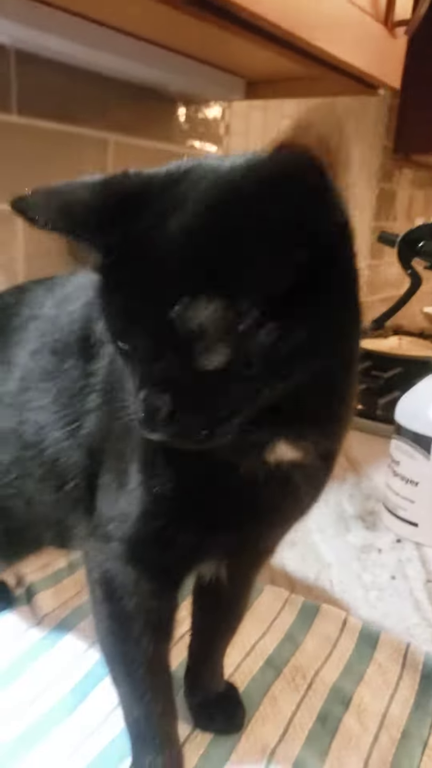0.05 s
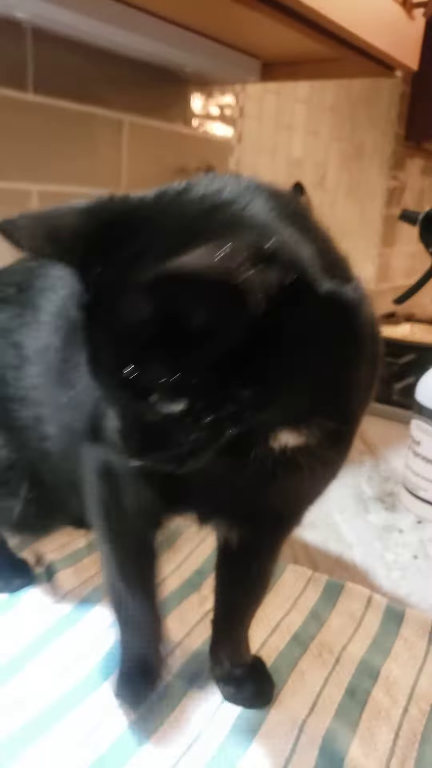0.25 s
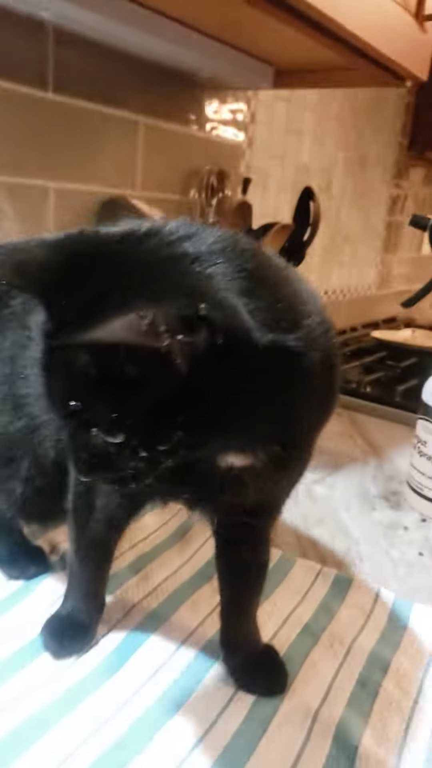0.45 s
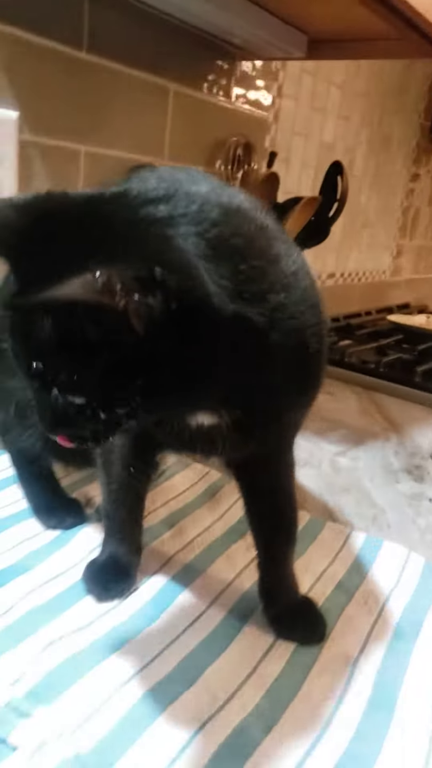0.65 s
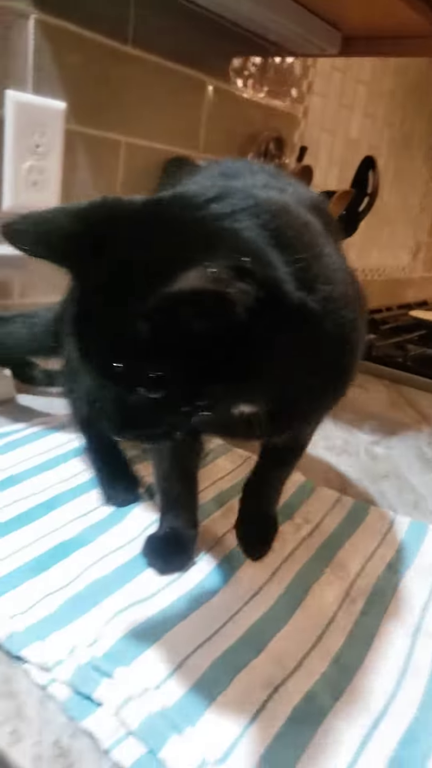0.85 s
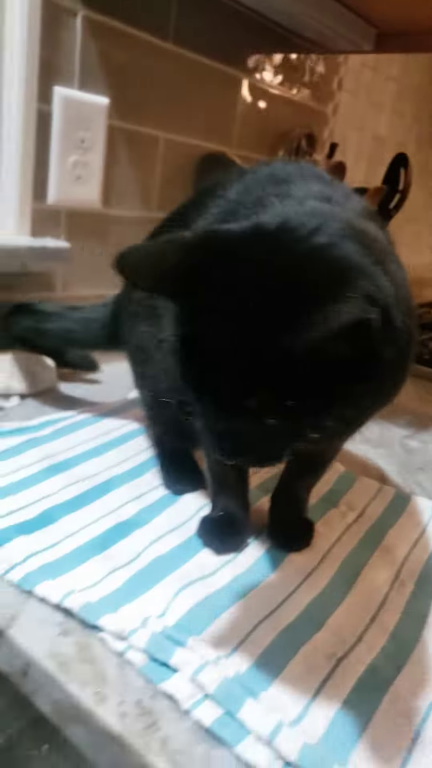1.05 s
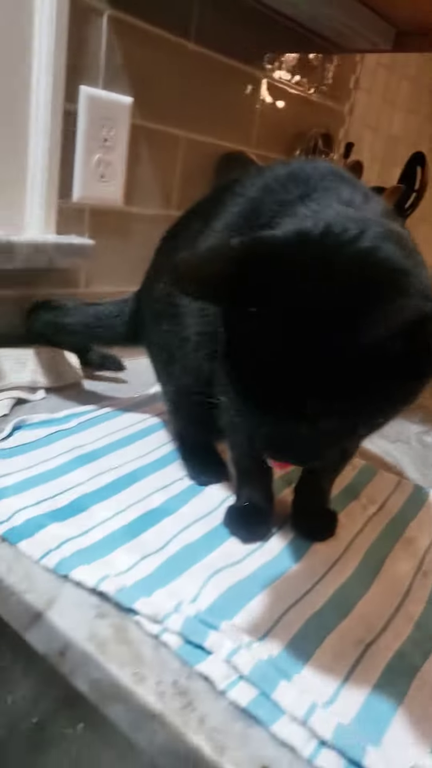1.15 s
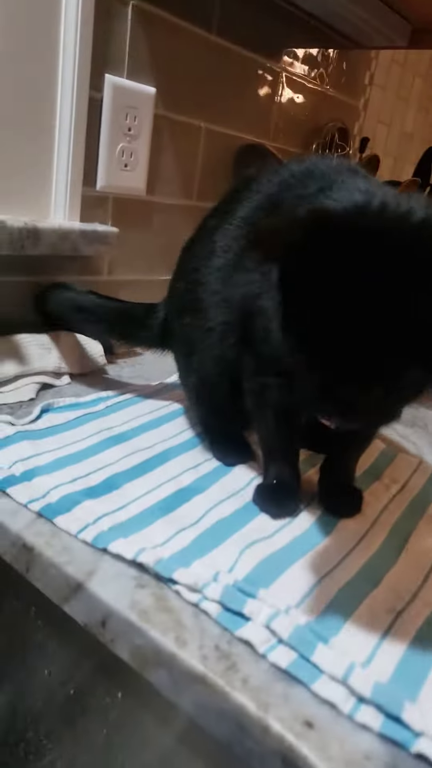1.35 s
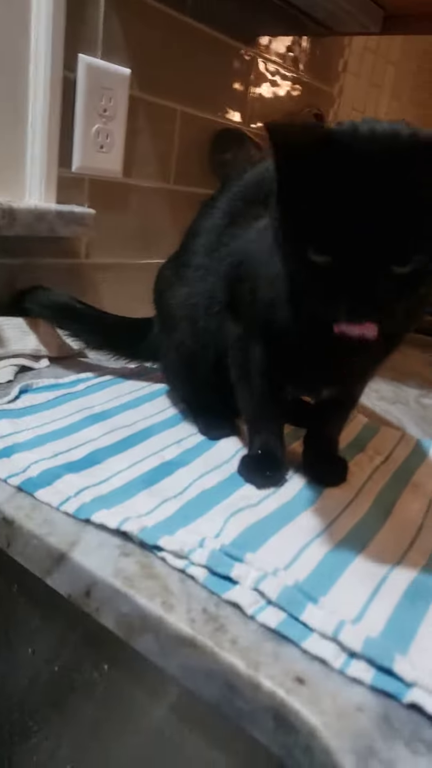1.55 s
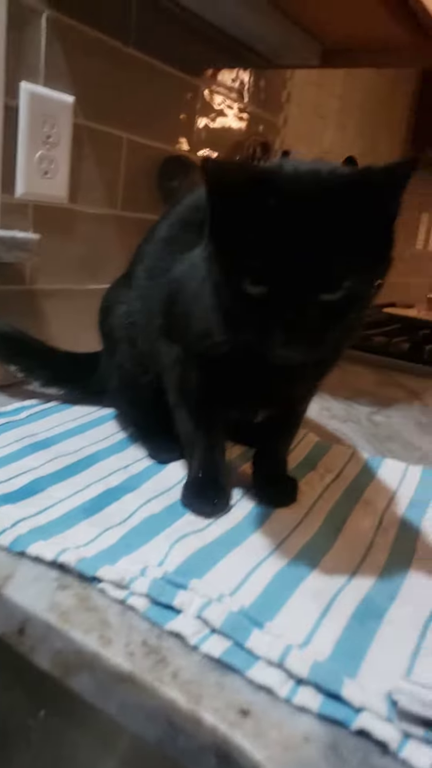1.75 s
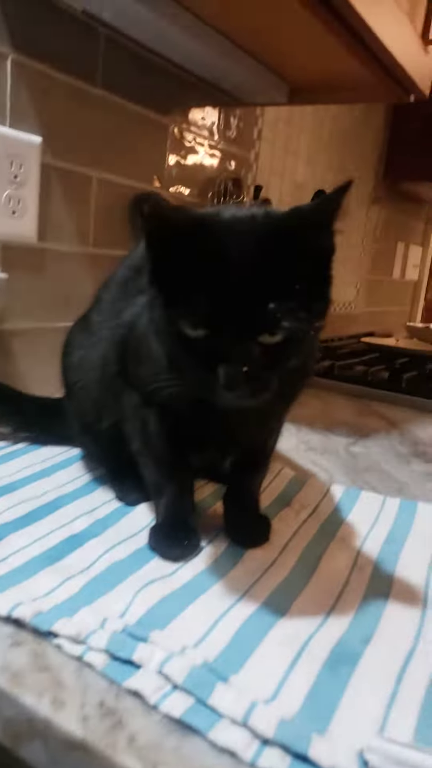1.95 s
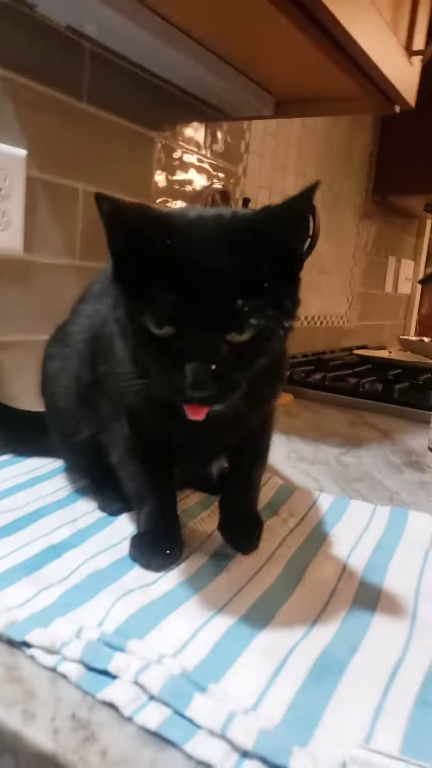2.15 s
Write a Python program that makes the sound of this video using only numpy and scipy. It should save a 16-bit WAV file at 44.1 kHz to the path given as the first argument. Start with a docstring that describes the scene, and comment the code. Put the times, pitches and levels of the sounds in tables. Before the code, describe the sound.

Small wet lip smacks from a cat click irregularly, close by and to the right, ringing briefly off kitchen tiles. A wavering low drone and faint motor whirr continue behind them, with light rumble from the hand-held microphone.

```python
"""Cat smacking its lips

On a kitchen counter, saliva films part in a cat's mouth: tiny, very high wet ticks that ring
briefly off the tiles. A low drone swells and sinks underneath, with a small motor's faint whirr
on the right. The hand-held microphone rumbles and takes a few soft bumps."""
import sys
import numpy as np
from scipy import signal
from scipy.fft import rfft, irfft, next_fast_len
from scipy.io import wavfile
from scipy.ndimage import map_coordinates

SR = 44100
rng = np.random.default_rng(int(sys.argv[2]) if len(sys.argv) > 2 else 0)


def bounce(signal):
    """Save signal as a 16-bit WAV file at the path given by the first command-line argument."""
    frames = np.transpose(np.atleast_2d(signal))
    limited = np.clip(frames, -1, 1)
    pcm = np.round(limited * 32767).astype(np.int16)
    wavfile.write(sys.argv[1], SR, pcm)


N = 97020

# Handling rumble envelope (time [s], level [dB])
RUMBLE_ENVELOPE = [(0, -69.5), (.22, -62.5), (.42, -64.5), (.78, -67.5), (1.1, -64.5), (2.2, -65)]
# Noise floor spectra (frequency [Hz], relative density [dB])
RUMBLE_SPECTRUM = [(25, -11), (70, 6.5), (120, -1), (170, -8), (300, -14), (500, -21.5), (900, -29.5),
                   (2000, -54)]
AIR_SPECTRUM = [(100, 6), (500, -3.5), (1000, -1), (2000, 0.5), (3500, 1), (5000, -1.5), (6500, -8),
                (8500, 0.5), (16000, -2)]
HISS_SPECTRUM = [(8400, -30.5), (9300, -3.5), (11000, 0), (13000, 0), (15700, 0.5), (16300, -55)]
# Low drone envelope (time [s], relative level [dB])
DRONE_ENVELOPE = [(0, -65), (.1, -54), (.19, -61.5), (.25, -44), (.3, -56), (.38, -49), (.57, -50),
                  (.68, -58.5), (.88, -55.5), (1.02, -49.5), (1.33, -48.5), (1.38, -58), (1.46, -51.5),
                  (1.52, -60.5), (1.58, -52.5), (1.72, -48), (1.92, -49.5), (2.2, -59)]
# Motor envelope (time [s], relative level [dB])
WHIRR_ENVELOPE = [(0, -75), (.25, -71), (.45, -75), (.7, -74.5), (.84, -69.5), (1.25, -67), (1.55, -71),
                  (1.72, -65.5), (2, -67), (2.2, -69.5)]
# Motor rush spectrum (frequency [Hz], relative density [dB])
WHIRR_SPECTRUM = [(600, -14), (1000, -21.5), (1350, -9), (1520, -2), (1800, 1.5), (2020, 4), (2200, -3.5),
                  (2400, -14.5), (2800, -7.5), (3200, -18.5), (3800, -24.5), (4400, -13.5), (5100, -18.5),
                  (6200, -48)]
# Motor tones (frequency [Hz], mean level before panning [dB])
MOTOR_TONES = [(1130, -96.5), (1525, -81.5), (1776, -86), (1954, -83)]
# Lip smacks (time [s], level before EQ [dB], pitch [Hz], splash re ping [dB])
SMACKS = [(0.037, -36.5, 10350, -2), (0.2366, -33, 11000, -4), (0.257, -33, 10800, 0.5),
          (.276, -30, 11600, 3.5), (0.303, -30, 14500, -2), (0.4361, -39, 10800, -8),
          (0.4613, -26, 11300, 2), (0.4912, -23.5, 11440, -6), (0.641, -27, 15000, -19),
          (.6495, -11, 11070, -26.5), (.6768, -21.5, 11600, -16), (0.768, -30.5, 12000, 5),
          (0.918, -37, 12800, -5), (1.0342, -33.5, 11500, -11), (1.2353, -35.5, 10200, 2.5),
          (1.2751, -21.5, 9800, -4), (1.3905, -26, 10230, -16), (1.431, -34.5, 14500, -6),
          (1.538, -34, 13500, -9), (1.601, -32.5, 10060, -14), (1.7236, -21.5, 12270, -17),
          (1.8276, -32, 11350, -12), (1.8524, -28.5, 13300, -10.5), (1.97, -35, 14000, -6.5),
          (2.086, -31.5, 11900, -15.5)]
# Tick colour (frequency [Hz], gain [dB])
TICK_EQ = [(2000, -29.5), (3700, -33), (5000, -17.5), (6200, -32.5), (7400, -17.5), (8200, -26.5),
           (8900, -5.5), (11000, 2), (13000, -1.5), (15500, -4.5)]
# Soft taps and rubs, and one brief swell of the whirr at 2823 Hz
# (time [s], level [dB], time sigma [s], centre [Hz], band sigma [Hz])
NOISE_SWELLS = [(0.068, -58, 0.00084, 1870, 550), (0.342, -59, 0.00064, 2400, 750),
                (1.55, -69.5, 0.037, 306, 109), (1.552, -62, .0008, 1300, 1100),
                (1.694, -63, .0015, 4800, 600), (1.851, -60.5, 0.0018, 4960, 500),
                (1.86, -64, 0.018, 4780, 390), (1.86, -72.5, 0.11, 2823, 127),
                (2.03, -67.5, 0.02, 1380, 108)]
# Shading of direct sound at the left port (frequency [Hz], gain [dB])
LEFT_DIRECT_EQ = [(7000, -14.5), (9700, -8), (11000, -47), (16000, -20)]
# Shading of echoes and hiss at the left port (frequency [Hz], gain [dB])
LEFT_DIFFUSE_EQ = [(7000, -2.5), (9700, -1.5), (11000, -13.5), (16000, -16)]
# Hand on the microphone (time [s], level [dB], pitch [Hz], left re right [dB])
HAND_BUMPS = [(0.19, -56.5, 75.6, -19), (0.237, -43, 90, -7.5), (0.479, -49, 113, 12),
              (0.623, -53.5, 121, 13), (1.321, -48, 78, -21), (1.425, -60.5, 89, -29), (1.581, -54, 123, 6),
              (1.896, -49.5, 85, 13.5)]

TIME_S = np.arange(N) / SR


def amp(db):
    """Decibels to gain."""
    return 10 ** (np.asarray(db) / 20)


def unit(x):
    """Scale to rms 1."""
    return x / np.sqrt(np.mean(x ** 2) + 1e-20)


def pan(left_re_right_db):
    """Left and right gains."""
    return amp(np.array([[left_re_right_db], [-left_re_right_db]]) / 2)


def curve(rows):
    """(time [s], value) rows to one value per sample."""
    return np.interp(TIME_S, *np.transpose(rows))


def wobble(knots_per_s):
    """Smooth random curve, rms near 1."""
    return map_coordinates(rng.standard_normal(256), [TIME_S * knots_per_s], mode="wrap")


def filtered(x, response):
    """Apply a frequency response by FFT."""
    size = next_fast_len(N + SR // 2)
    return irfft(rfft(x, size) * response(np.fft.rfftfreq(size, 1 / SR)), size)[..., :N]


def eq(x, points):
    """Filter by (frequency [Hz], gain [dB]) points on a log axis."""
    knots_hz, db = np.transpose(points)
    return filtered(x, lambda hz: amp(np.interp(np.log(hz + 1), np.log(knots_hz), db)))


def noise(spectrum):
    """Shaped noise, rms 1."""
    return unit(eq(rng.standard_normal(N), spectrum))


def band(hz, sigma_hz, size=N):
    """Noise in a Gaussian band, rms 1."""
    magnitude = bell(np.fft.rfftfreq(size, 1 / SR) - hz, sigma_hz)
    return unit(irfft(magnitude * np.exp(2j * np.pi * rng.random(len(magnitude))), size))


def bell(x, sigma):
    """Gaussian, peak 1."""
    return np.exp(-.5 * (x / sigma) ** 2)


def add(track, centre_s, sound):
    """Mix a sound in, centred on a time."""
    at = round(centre_s * SR) - len(sound) // 2 + np.arange(len(sound))
    inside = (at >= 0) & (at < N)
    track[at[inside]] += sound[inside]


def noise_floor():
    """Rumble from hand movement, faint air, thin high hiss."""
    mid = noise(RUMBLE_SPECTRUM)
    side = amp(-3) * np.outer([1, -1], noise(RUMBLE_SPECTRUM))
    rumble = amp(curve(RUMBLE_ENVELOPE)) * (mid + side)
    air = amp(-77.5) * np.array([noise(AIR_SPECTRUM), noise(AIR_SPECTRUM)])
    hiss = amp(-68.5) * np.array([eq(noise(HISS_SPECTRUM), LEFT_DIFFUSE_EQ), noise(HISS_SPECTRUM)])
    return rumble + air + hiss


def low_drone(drone_hz=58.2, waver_rad=0.74, fan_hz=398):
    """Low tone that swells and sinks, plus a faint steady fan tone."""
    phase = 2 * np.pi * drone_hz * TIME_S + waver_rad * wobble(6)
    drone = pan(3) * amp(curve(DRONE_ENVELOPE) - 2) * np.sin(phase)
    fan = amp(-90) * np.sin(2 * np.pi * fan_hz * TIME_S)
    return np.sqrt(2) * (drone + fan)


def motor_whirr(swell_db=2, waver_rad=0.7, waver_db=4.5):
    """Small motor on the right: uneven resonant rush, thin unsteady tones."""
    level_db = curve(WHIRR_ENVELOPE)
    rush = amp(level_db + 3.5 + swell_db * wobble(7)) * noise(WHIRR_SPECTRUM)
    whirr = np.outer([0, 1], rush)
    tone_pan = pan(-17) / pan(-17).mean()
    for hz, db in MOTOR_TONES:
        tone = np.sqrt(2) * np.sin(2 * np.pi * hz * TIME_S + waver_rad * wobble(17))
        tone_db = db + level_db - level_db.mean() + waver_db * wobble(10.4)
        whirr += tone_pan * amp(tone_db) * tone
    return whirr


def crackle(mean_per_s=76, spread_db=4, fall_s=0.0007, candidates=300):
    """Faint broad ticks at random times."""
    starts = rng.integers(N, size=candidates)
    kept = rng.random(candidates) * candidates < mean_per_s * N / SR
    level_db = -49 + spread_db * np.minimum(rng.standard_normal(candidates), 2)
    impulses = np.bincount(starts, amp(level_db) * kept, N)
    decay = np.exp(-np.arange(SR // 100) / SR / fall_s)
    return signal.fftconvolve(impulses, decay)[:N] * noise(HISS_SPECTRUM)


def smack(db, hz, splash_db, rise_s=0.00012, fall_s=0.0012, snap_db=13.5):
    """A saliva film parts: a ping of a few cycles, and a spray of fizz and broad splash."""
    t = np.arange(-SR // 100, SR // 100) / SR
    sigma_s = 0.00035 * amp(0.11 * db)  # bigger ticks ring longer
    ping = bell(t, sigma_s) * np.sin(2 * np.pi * (hz * t + rng.random()))
    burst = np.exp(np.minimum(t / rise_s, -t / fall_s))
    fizz = unit(burst * band(hz, sigma_hz=1420, size=len(t)))
    snap = amp(snap_db) * (t == 0)  # instant of parting
    splash = unit(burst * rng.standard_normal(len(t)) + snap)
    burst_rms = np.sqrt(np.mean(burst ** 2))
    spray = burst_rms * (amp(-12) * fizz + amp(splash_db) * splash)
    return amp(db) * ping, amp(db) * spray


def tile_echoes(x, early_t60_s=0.02, tail_t60_s=0.2, gap_s=0.001):
    """Quick echoes off counter and wall, then the kitchen's tail."""
    t = np.arange(SR // 2) / SR
    wet = np.zeros(N)
    for t60_s, db in (early_t60_s, -2.5), (tail_t60_s, -3):
        decay = amp(-60 * t / t60_s) * (t > gap_s)
        response = decay * rng.standard_normal(len(t)) / np.linalg.norm(decay)
        wet += amp(db) * signal.fftconvolve(x, response)[:N]
    return wet


def noise_swells():
    """Soft taps and rubs, and one brief swell of the whirr."""
    return sum(amp(db) * bell(TIME_S - at_s, sigma_s) * band(hz, sigma_hz)
               for at_s, db, sigma_s, hz, sigma_hz in NOISE_SWELLS)


def cat_and_swells(left_lag_s=0.000302, ping_send=0.28):
    """Smacks, crackle and noise swells near the right port; the left is later and shaded."""
    pings, sprays = np.zeros(N), crackle()
    for at_s, db, hz, splash_db in SMACKS:
        ping, spray = smack(db, hz, splash_db)
        add(pings, at_s, ping)
        add(sprays, at_s, spray)
    direct = eq(pings + sprays, TICK_EQ) + noise_swells()
    to_tiles = eq(ping_send * pings + sprays, TICK_EQ)
    delayed = filtered(direct, lambda hz: np.exp(-2j * np.pi * hz * left_lag_s))
    left = eq(delayed, LEFT_DIRECT_EQ) + eq(tile_echoes(to_tiles), LEFT_DIFFUSE_EQ)
    right = direct + tile_echoes(to_tiles)
    return np.array([left, right])


def hand_bumps(sigma_s=0.0046):
    """Thuds of a cycle or two with skin scuffing the case, each nearer one port."""
    scuff = amp(-20.5) * band(hz=204, sigma_hz=114)
    bumps = np.zeros((2, N))
    for at_s, db, hz, pan_db in HAND_BUMPS:
        t = TIME_S - at_s
        bumps += pan(pan_db) * amp(db) * bell(t, sigma_s) * (np.sin(2 * np.pi * hz * t) + scuff)
    return bumps


def scene():
    """Background, cat and bumps, in stereo."""
    return noise_floor() + low_drone() + motor_whirr() + cat_and_swells() + hand_bumps()


def record(dry):
    """Brick-wall low-pass."""
    return filtered(dry, lambda hz: hz < 16500)


dry = scene()
out = record(dry)
bounce(out)
```